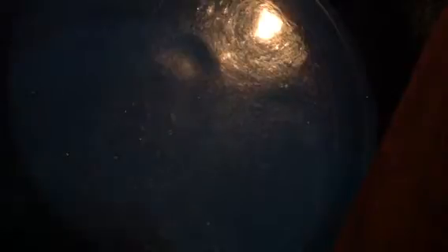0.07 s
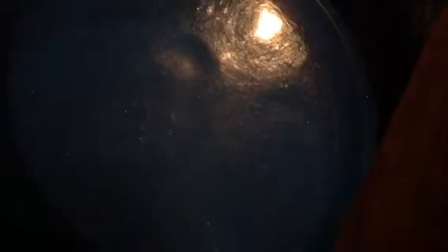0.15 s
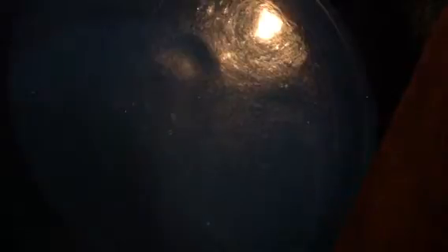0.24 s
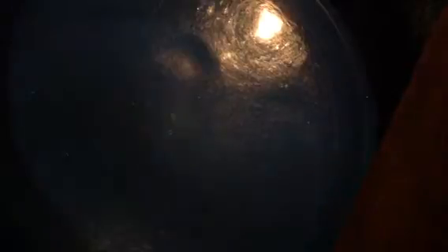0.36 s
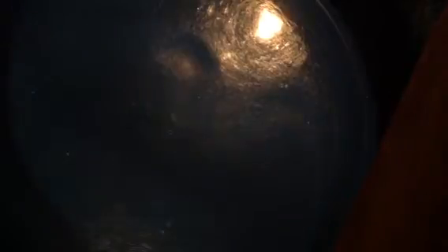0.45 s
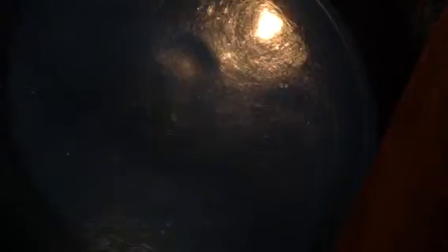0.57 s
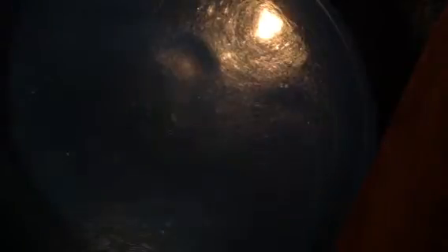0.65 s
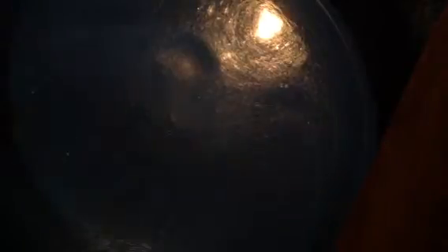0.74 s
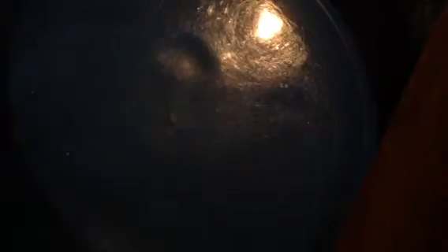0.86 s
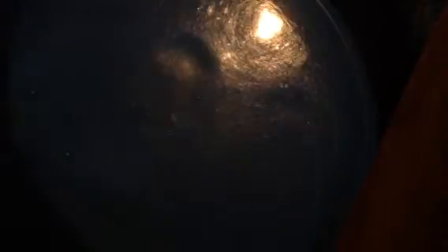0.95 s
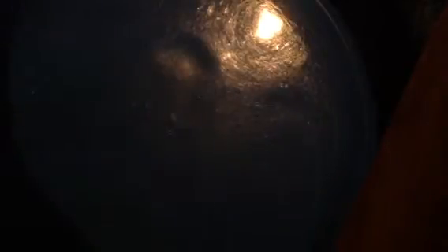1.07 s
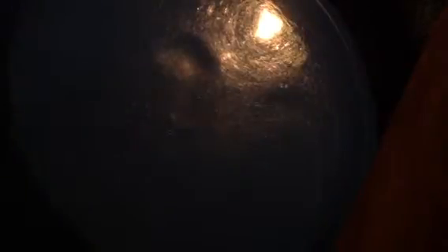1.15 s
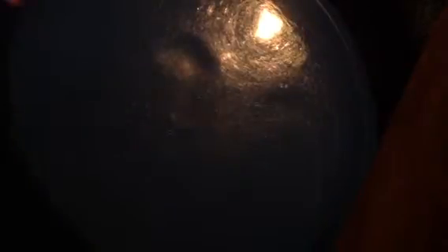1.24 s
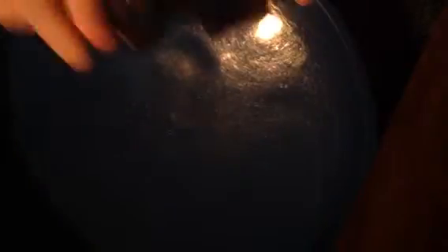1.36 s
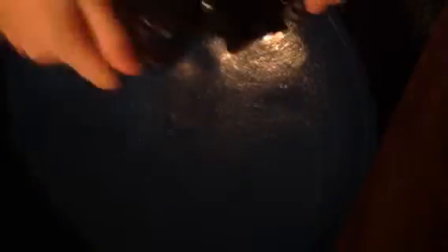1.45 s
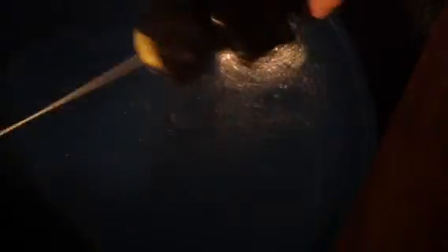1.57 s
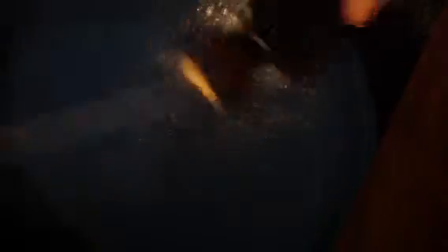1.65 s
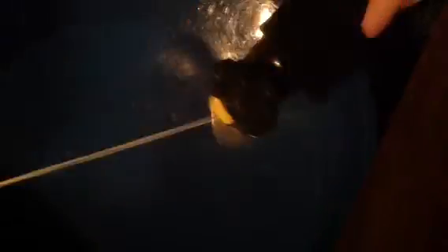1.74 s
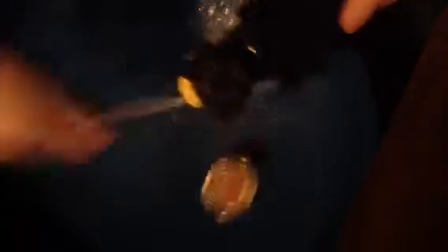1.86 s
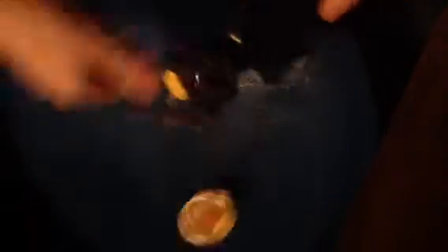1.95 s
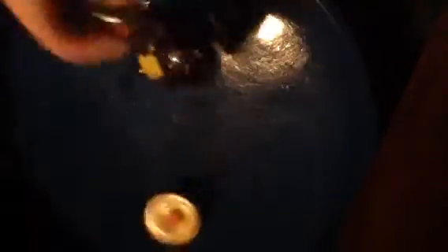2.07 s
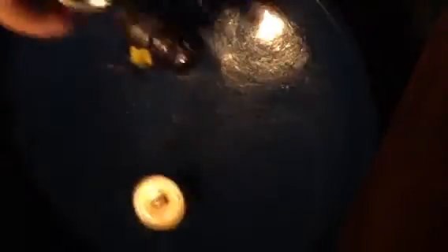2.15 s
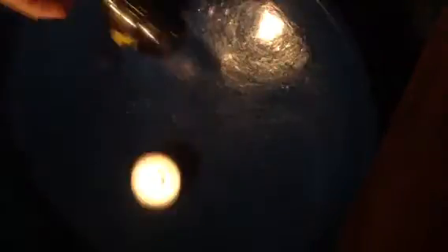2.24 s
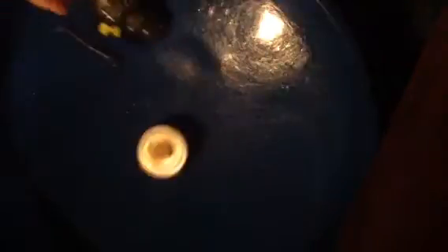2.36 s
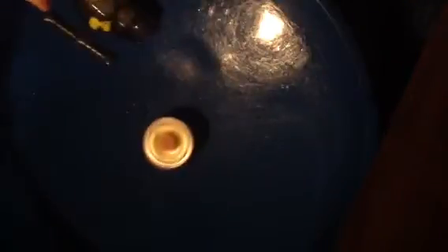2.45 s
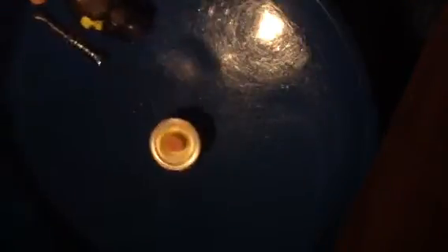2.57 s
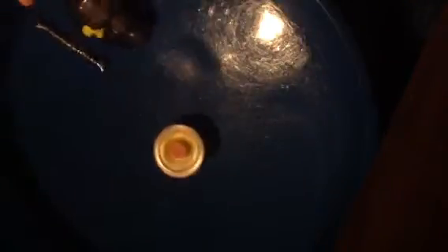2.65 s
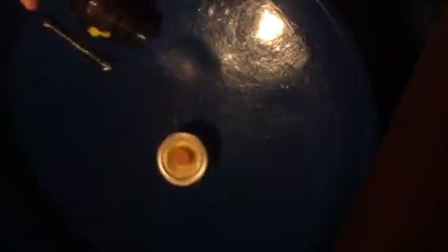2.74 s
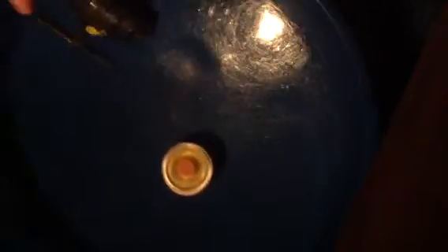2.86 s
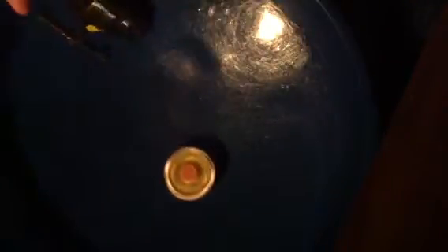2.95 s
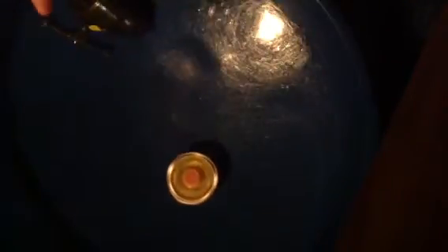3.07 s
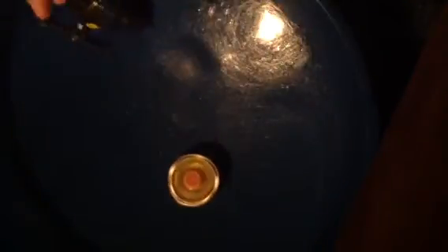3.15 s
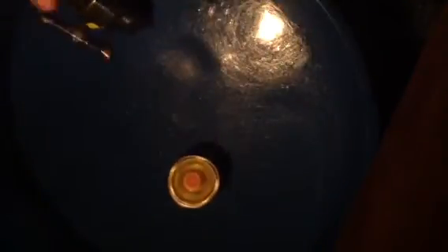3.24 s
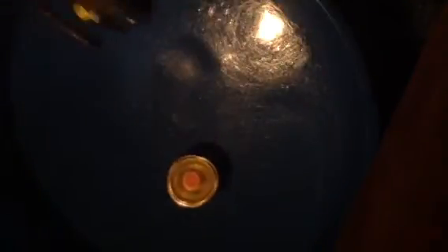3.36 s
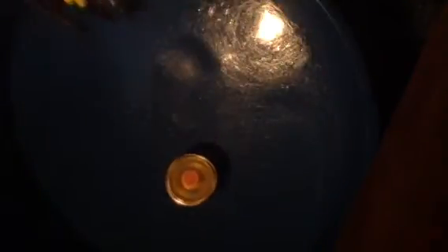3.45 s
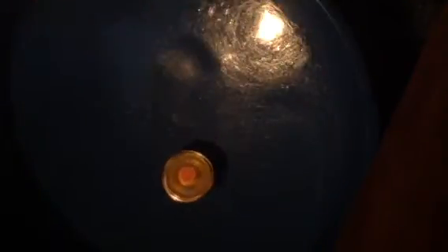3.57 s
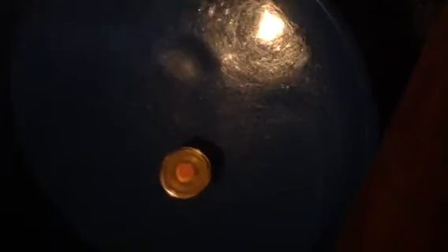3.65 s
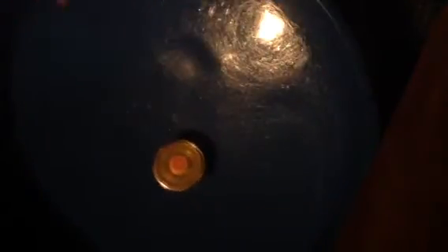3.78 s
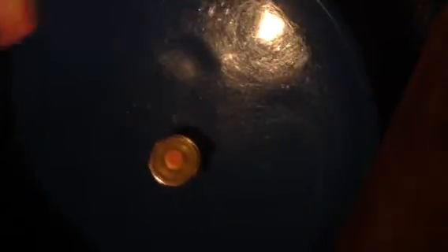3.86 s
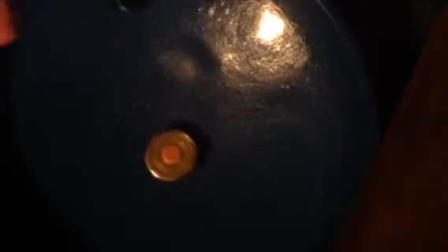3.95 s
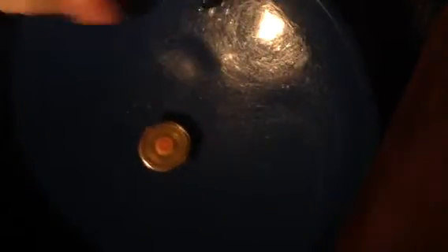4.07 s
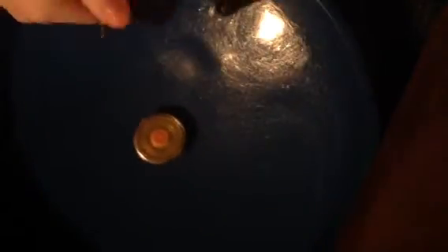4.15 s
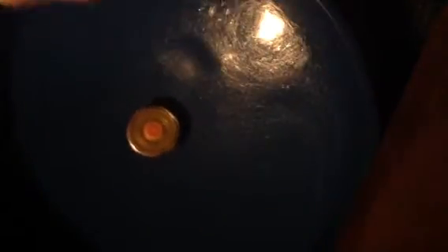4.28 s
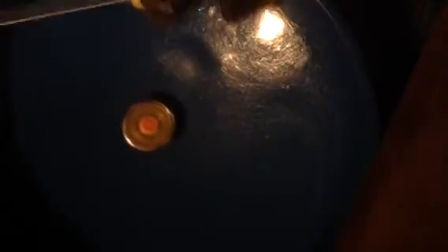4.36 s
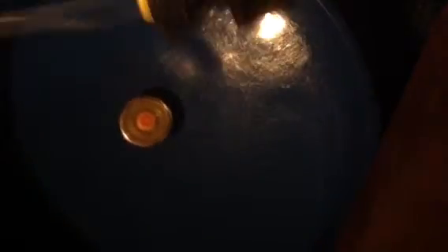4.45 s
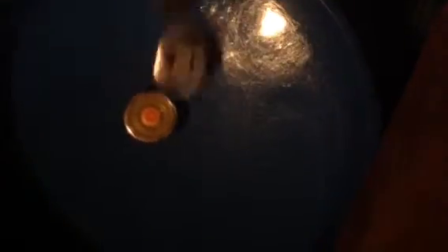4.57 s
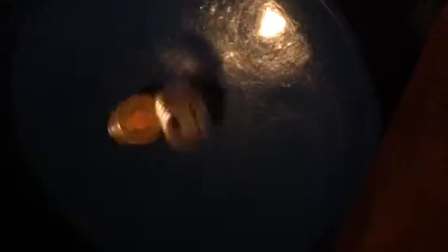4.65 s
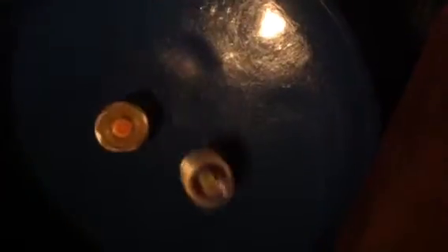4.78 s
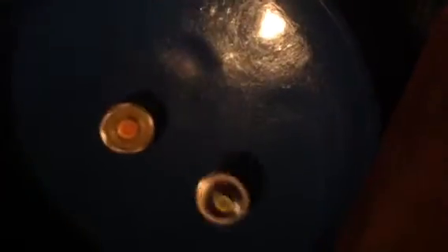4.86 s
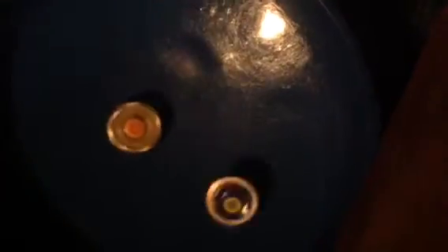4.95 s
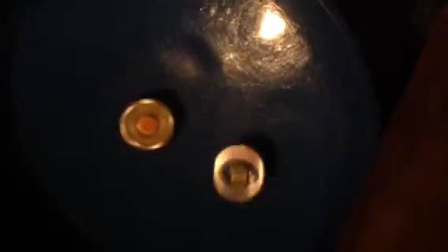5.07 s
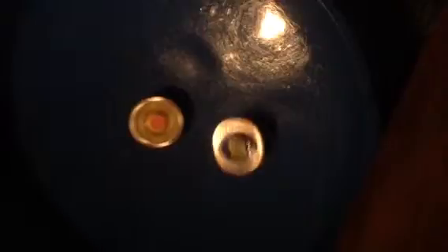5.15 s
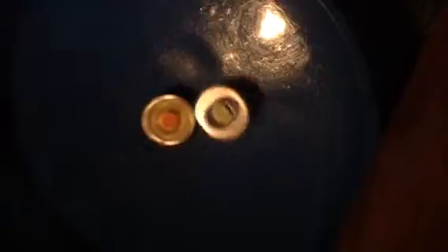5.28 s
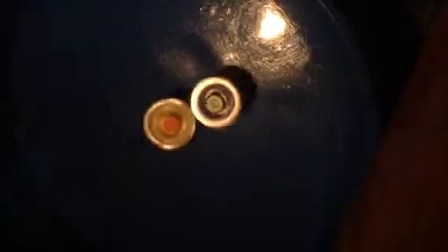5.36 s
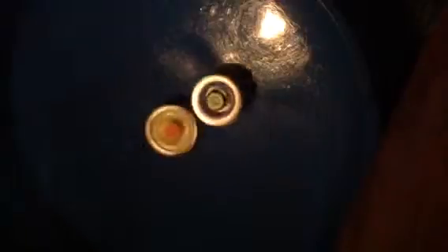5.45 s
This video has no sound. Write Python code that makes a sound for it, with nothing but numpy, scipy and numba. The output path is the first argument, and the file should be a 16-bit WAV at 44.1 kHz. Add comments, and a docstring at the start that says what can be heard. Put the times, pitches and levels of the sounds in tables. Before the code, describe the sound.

A sharp plastic click and a soft rustle of hands open the sound. From 0.5 to 0.7 seconds a toy launcher's ratchet snaps six times. At about 1.6 a ripcord gives a short gritty zip, and at 1.8 a spinning top thuds into a thin plastic bowl, bounces and grinds, then settles into a quiet low hum. Launcher parts click, chafe and chink with tiny metallic rings from 2 to 3.5 seconds. Four more ratchet snaps come around 3.6, followed by light ticks. A second, louder zip at 4.4 drops another top at 4.5 among sharp clacks. It hops with hollow knocks and brief bright scrapes, growing lighter until 5.3. The tops' metal rims clash sharply at 5.4 and again just before 5.5. Everything is close to the microphone, with a short small-room echo over faint hiss.

```python
"""Spinning tops in a plastic bowl

A small room, one microphone close to the bowl. Two toy tops are twisted into a plastic launcher,
spun up by a ripcord and dropped in, one after the other. Launcher parts click, chink and chafe, and
the cord rips through its gear. Each top thuds down and hums on its tip; the second hops and skids,
and the metal rims clash at the end. The walls answer briefly over a faint hiss."""
import sys
import numpy as np
from scipy import signal
from scipy.fft import rfft, irfft
from scipy.io import wavfile
from scipy.ndimage import uniform_filter1d
from numba import njit

SR = 44100
rng = np.random.default_rng(int(sys.argv[2]) if len(sys.argv) > 2 else 0)


def master_out(mix):
    """Clip the mix to full scale and print it as 16-bit PCM to the path in sys.argv[1]."""
    frames = np.transpose(np.atleast_2d(mix))
    ceiling = np.clip(frames, -1, 1)
    pcm = np.round(ceiling * 32767).astype(np.int16)
    wavfile.write(sys.argv[1], SR, pcm)


N = 243115
LEAD = 4096  # samples of run-up before 0 s
M = N + LEAD
T = (np.arange(M) - LEAD) / SR

# modes of the thin plastic bowl: f/Hz, level/dB, t60/s
BOWL_MODES = [(180, -2, 0.038), (241.3, 0, 0.044), (300, -2.5, 0.054), (361, 1, 0.035), (437, -3, 0.034),
              (534, -0.5, 0.031), (657, -1.5, 0.056), (814, -3, 0.049), (1036, -28.5, 0.31),
              (1420, 5, 0.03), (1700, 8, 0.06)]
# bright resonances of hard parts in contact: f/Hz, width/Hz, level/dB
TREBLE_PEAKS = [(6540, 1200, -13.5), (8940, 4760, 13), (14000, 6040, 12)]


def spin(turns_per_s=53.2, slowing_per_s2=.91, steady_share=.22, settle_s=.77):
    """An off-centre tip presses the bowl once a turn; grinding noise takes over after each landing."""
    # tip on the bowl: t/s, level/dB, ring under the tip f/Hz
    path = [(1.78, -52, 308), (2.2, -39, 300), (2.3, -49.5, 330), (2.6, -57, 347), (2.85, -54, 340),
            (2.93, -56, 408), (3.15, -65, 398), (3.3, -63.5, 310), (3.6, -61, 516), (3.95, -62, 300),
            (4.25, -54, 312), (4.45, -54, 300), (4.55, -36.5, 300), (4.9, -45, 385), (5.1, -43.5, 660),
            (5.3, -43.5, 446), (5.51, -44, 300)]
    # the tops land: t/s
    landings = [1.78, 4.6]
    turns = np.cumsum(turns_per_s - slowing_per_s2 * T) / SR
    taps = unit(np.diff(np.floor(turns), prepend=0))
    unsettled = sum((T > at) * np.exp(-((T - at) / settle_s) ** 2) for at in landings)
    noise_share = np.clip(steady_share + (1 - steady_share) * unsettled, 0, 1)
    grinding = rng.standard_normal(M) * undb(2.5 * walk(27))
    drive = np.sqrt(1 - noise_share) * taps + np.sqrt(noise_share) * grinding
    drive = signal.sosfilt(signal.butter(3, 750, fs=SR, output="sos"), drive)
    bowl = sum((-1) ** k * undb(db) * band(drive, f, 5.3 / t60)
               for k, (f, db, t60) in enumerate(BOWL_MODES))
    s, _, hz = np.transpose(path)
    hz = np.interp(T, s, hz)
    under_tip = glide(glide(drive, hz, .14), hz, .38)
    return curve(path) * unit(unit(bowl) + 1.35 * unit(under_tip))


def thuds(push_s=.0013):
    """A landing tip gives the bowl floor a short push; the open bowl radiates little deep bass."""
    # tip strikes: t/s, peak level/dB, most driven f/Hz
    strikes = [(1.778, 0, 294), (1.808, -14.5, 262), (1.907, -6, 350), (1.987, -23.5, 250),
               (2.047, -20, 250), (2.105, -23, 253), (2.131, -23, 248), (2.175, -31, 336),
               (2.209, -34, 294), (2.237, -34.5, 294), (2.358, -34, 373), (4.521, -8, 244),
               (4.536, -17, 270), (4.551, -18, 330), (4.607, -19, 360), (4.691, -11, 206),
               (4.765, -15.5, 237), (4.822, -21.5, 355), (4.873, -25, 361), (4.923, -22.5, 362),
               (4.981, -27, 353), (5.023, -28.5, 614), (5.066, -31, 560), (5.103, -24.5, 614),
               (5.135, -27.5, 615), (5.174, -24.5, 221), (5.238, -32, 645), (5.276, -28, 219),
               (5.407, -19, 255)]
    out, t = np.zeros(M), np.arange(SR // 3) / SR
    low_cut = signal.butter(2, 190, "high", fs=SR, output="sos")
    push = np.hanning(int(push_s * SR))
    for s, db, hz in strikes:
        modes = ring(t, BOWL_MODES, hz, 7.2) * np.minimum(t / .0023, 1)
        thud = signal.sosfilt(low_cut, np.convolve(modes, push))
        add(out, s, undb(db) * thud / np.abs(thud).max())
    return out


def skids():
    """The tip of the hopping top scrapes the bowl in short, bright bursts of noise."""
    # scrapes on the bowl: t/s, relative level/dB, length/s
    scrapes = [(4.82, -13, 0.0096), (4.868, -16, .014), (4.919, -19, 0.01), (4.978, -19.5, 0.017),
               (5.021, -19.5, 0.0099), (5.058, -20.5, 0.024), (5.093, -23, 0.021), (5.136, -19.5, 0.0096),
               (5.176, -19.5, 0.0077), (5.193, -24, 0.021), (5.239, -20.5, 0.004), (5.278, -17.5, .002),
               (5.31, -27.5, .0036), (5.328, -27, 0.0017), (5.363, -29.5, .002)]
    out, t = np.zeros(M), np.arange(SR // 10) / SR
    for s, db, length in scrapes:
        envelope = .5 / (1 + (t / max(length, .002)) ** 8) + .5 * fade(t, .0067)
        noise = rng.standard_normal(len(t))
        scrape = unit(colour(noise, TREBLE_PEAKS)) + undb(5) * unit(shell(noise))
        add(out, s, undb(db - 18.5) * np.minimum(t / .0015, 1) * envelope * scrape)
    return out


def clashes():
    """The metal rims of the two tops strike each other and ring."""
    # rim hits: t/s, crack level/dB, body/dB re crack, body f/Hz, rim/dB re crack
    hits = [(5.3965, 0, -17, 3450, -32), (5.4022, 2, -12, 4550, -28), (5.4115, -9, 3, 4600, -10),
            (5.469, -1, -17, 3680, -32)]
    return knocks(hits, rise_s=.0004, t60=.009, width=.2, wall_db=-17)


def ripcord(attack_s=.082, release_s=.011, rest_hz=1060, fast_hz=1500, sag=.19):
    """Teeth hammer the gear too fast to count: lumpy grit through a shell whose ring rises with speed."""
    # pulls: start t/s, end t/s, body level on reaching full speed/dB, swell from there/dB
    pulls = [(1.553, 1.714, -23, -4), (4.339, 4.487, -20, 1.5)]
    teeth = grit(2300, .46) * undb(.58 * walk(130))
    treble, out = unit(colour(teeth, TREBLE_PEAKS)), 0
    for start, end, db, swell_db in pulls:
        speed = np.sin(np.pi / 2 * np.clip((T - start) / attack_s, 0, 1))
        run = np.clip((T - start - attack_s) / (end - start - attack_s), 0, 1)
        hz = (rest_hz + (fast_hz - rest_hz) * speed ** 3) * (1 - sag * run)
        gain = (T > start) * undb(db - 34.5 * (1 - speed) + swell_db * run ** 2.7)
        gain *= fade(np.maximum(T - end, 0), release_s)
        low_ring = unit(glide(glide(teeth, hz, .3), hz, .19))
        high_ring = unit(glide(teeth, (1.76 + 1.03 * run) * hz, .44))  # goes on rising
        body = unit(unit(shell(teeth)) + .89 * low_ring)
        body = unit(body + .45 * high_ring)
        out += gain * (body + undb(-4) * treble)
    return out


def ratchets():
    """The launcher's ratchet snaps as a top is twisted in."""
    # snaps: t/s, crack level/dB, body/dB re crack, body f/Hz
    snaps = [(0.497, -4, -6.5, 3700), (0.5368, -1.5, -7, 3620), (0.589, -3.5, -6, 3800),
             (0.6167, -2.5, -11.5, 3550), (0.6443, -1.5, -10.5, 3920), (0.6749, -6, -4, 3640),
             (3.5739, -2.5, -14.5, 2980), (3.5998, -4.5, -8, 4640), (3.6255, -4, -7.5, 3340),
             (3.671, -1.5, -9.5, 3180)]
    return knocks(snaps, rise_s=.0004, t60=.013, width=.09, wall_db=-7)


def clicks():
    """Parts of the launcher and the tops knock together."""
    # knocks, the first just before 0 s: t/s, crack level/dB, body/dB re crack, body f/Hz
    hits = [(-0.048, 0, -4, 2580), (0.168, -48, 6, 1100), (0.2216, -45, 10, 1690), (0.2359, -28.5, 5, 3770),
            (0.3456, -47.5, 6, 1800), (0.845, -39, 4.5, 2730), (1.0154, -45.5, 3, 2630),
            (1.3, -50, 6.5, 1100), (1.3244, -48.5, 6, 1046), (1.368, -43.5, 1.5, 1095),
            (1.4472, -45, 2, 1110), (1.6636, -10, -0.5, 3170), (1.708, -4, -6, 3530),
            (1.7165, -17, -3, 3470), (1.7658, -22, -24, 3780), (1.7782, -11.5, 5.5, 1500),
            (1.8604, -25, -3, 1110), (1.8742, -23.5, 0, 1670), (1.9048, -15, -2, 1140),
            (1.934, -21, -2, 1590), (1.9714, -21, -6.5, 3220), (1.9855, -4.5, -8.5, 1367),
            (2.008, -19, 4.5, 1200), (2.0496, -29, -10, 1460), (2.0708, -19, -6, 1400),
            (2.0856, -15, 1.5, 3430), (2.1132, -18, -7, 1280), (2.129, -5.5, -7, 4300),
            (2.1783, -42.5, 13.5, 1050), (2.2686, -32, 2.5, 2480), (2.315, -33, -5.5, 1070),
            (2.3526, -25.5, -2, 4000), (2.359, -9.5, -2.5, 1420), (2.3969, -19, -1, 1370),
            (2.562, -31, 0, 1430), (2.578, -35.5, 3.5, 3700), (2.6267, -46.5, 11, 1470),
            (2.7199, -28.5, -5.5, 1350), (2.7514, -49, 6, 1260), (2.8444, -40, -3.5, 1260),
            (2.8912, -34.5, 1.5, 1500), (2.9045, -31.5, 2.5, 1470), (2.9357, -37, -2.5, 1400),
            (3.0173, -27, -5.5, 1420), (3.0849, -15.5, -5.5, 3700), (3.1044, -8.5, -4.5, 1455),
            (3.3328, -45, 6, 1460), (3.3656, -33, 4, 1210), (3.3808, -41.5, 15, 1480),
            (3.4552, -21.5, 3, 3390), (3.6553, -31.5, -6, 3550), (3.8207, -34.5, 4, 1030),
            (3.829, -30, 2, 1680), (3.849, -28.5, -4, 1260), (3.8651, -20, -3.5, 1060),
            (3.919, -37, 4, 1090), (4.13, -48.5, 4, 1156), (4.1742, -45, 7, 1060), (4.2118, -42, -14, 1060),
            (4.237, -37, 5, 2590), (4.2549, -35.5, 10, 2730), (4.3182, -27.5, -3, 1330),
            (4.3759, -16, -3.5, 1400), (4.472, -2, -13, 3430), (4.486, -3, -5.5, 3000),
            (4.4977, -9.5, -8, 1310), (4.5805, -12.5, -4.5, 1320), (4.6104, -15, 0.5, 1490),
            (4.669, -0.5, -2, 3550), (4.6734, -6.5, 3, 4000), (4.6915, 1, -12.5, 1110),
            (4.718, -9.5, -16, 3320), (4.7694, -12.5, 2, 4060)]
    return knocks(hits, rise_s=.0012, t60=.018, width=.17, wall_db=-11)


def knocks(hits, rise_s, t60, width, wall_db):
    """Contact noise cracks and rings the plastic body; rows: sound close by, sound sent to the walls."""
    # modes of a top's metal rim: f/Hz, level/dB, t60/s
    rim_modes = [(3640, 0, .22), (3760, 0, .2), (4250, -3, .1), (7830, -4, .08), (9720, 6, .03),
                 (10750, 5, .03), (15020, 3, .03)]
    out, t = np.zeros((2, M)), np.arange(SR // 6) / SR
    impulse = 1. * (t == 0)
    even_crack = unit(colour(impulse, TREBLE_PEAKS))
    for s, db, body_db, hz, *rim_db in hits:
        contact = rng.standard_normal(len(t)) * fade(t, t60) * np.minimum(t / rise_s, 1)
        crack = colour(contact, TREBLE_PEAKS) + undb(-1.5) * contact
        crack /= np.abs(crack).max()
        main_ring = band(band(contact, hz, width * hz), hz, .5 * hz)
        body = shell(contact, hz, 2.64) + 2.6 * main_ring
        body *= undb(body_db) / np.abs(body).max()
        rim = undb(rim_db) * ring(t, rim_modes, 3900, 4.2) if rim_db else 0
        add(out[0], s, undb(db) * (crack + body + rim))
        # the walls hear the knock from all sides at once, so its colour is even there
        even_body = unit(shell(impulse, hz, 5) + .58 * band(impulse, hz, width * hz))
        add(out[1], s, undb(db + wall_db) * (crack.std() * even_crack + body.std() * even_body))
    return out


def shell(x, loud_hz=2000., db_per_octave=0.):
    """The plastic shell rings, driven hardest near loud_hz; it is too small to radiate bass."""
    # shell resonances: f/Hz, width/Hz, level/dB
    resonances = [(1320, 500, 6.5), (2092, 1270, 1.5), (3060, 1500, -5.5), (4600, 2950, -4.5)]
    peaks = [(hz, width, db - db_per_octave * abs(np.log2(hz / loud_hz)))
             for hz, width, db in resonances]
    return signal.sosfilt(signal.butter(4, 1000, "high", fs=SR, output="sos"), colour(x, peaks))


def chinks():
    """Loose metal parts in the launcher tick, then ring."""
    # contacts: t/s, relative level/dB, most driven f/Hz
    contacts = [(2.3236, -37, 9550), (2.362, -10.5, 9200), (2.3984, -21.5, 10200), (2.4307, -20.5, 10100),
                (2.7185, -32.5, 9600), (2.793, -32, 14000), (2.81, -31.5, 10000), (2.8395, -35.5, 10000),
                (2.9032, -32, 11200), (2.922, -28, 10300), (2.9695, -37.5, 9390), (3.0165, -42, 11000),
                (3.0235, -35, 10900), (3.0594, -24.5, 10400), (3.0747, -21, 13500), (3.0838, -23, 8140),
                (3.103, -10.5, 14000), (3.8386, -28, 10400), (3.8683, -16.5, 10400), (4.3258, -13, 13100),
                (4.692, -13, 9300), (4.718, -15, 9800)]
    # modes of the small parts: f/Hz, level/dB, t60 before extra damping/s
    metal_modes = [(7850, -3, .03), (9400, 0, .03), (10100, 0, .04), (11050, -3, .065), (13850, -2, .03),
                   (15000, -8, .025)]
    out, t = np.zeros(M), np.arange(SR // 6) / SR
    for s, db, hz in contacts:
        tick = colour(rng.standard_normal(len(t)) * fade(t, .016), TREBLE_PEAKS)
        rise = np.minimum(t / .00058, 1)
        modes = ring(t, metal_modes, hz, 45) * fade(t, .065)
        add(out, s, undb(db + 4) * (.37 * tick / np.abs(tick).max() + rise * modes))
    return out


def chafe():
    """Loose parts rub between the knocks: fine grit that flickers."""
    # rubbing through the shell: t/s, level/dB
    levels = [(1.72, -67), (1.8, -38.5), (1.88, -40), (2.0, -37.5), (2.25, -55.5), (2.45, -54), (2.6, -65),
              (3.3, -60.5), (3.55, -52.5), (3.85, -53), (3.96, -84), (4.25, -52.5), (4.32, -55),
              (4.5, -29.5), (4.62, -30.5), (4.8, -48), (5.0, -78), (5.38, -54), (5.51, -64)]
    rub = grit(4000, 1.5) * undb(1.1 * walk(60))
    return curve(levels) * (unit(shell(rub)) + undb(-3.5) * unit(colour(rub, TREBLE_PEAKS)))


def rustle():
    """Hands rustle softly at the start: dull, flickering noise."""
    # hand movement: t/s, level/dB
    levels = [(-.1, -61), (.15, -59), (.4, -72)]
    flicker = undb(1.5 * walk(30))
    return curve(levels) * flicker * unit(colour(rng.standard_normal(M), [(330, 350, 0)]))


def room(x):
    """The small room's diffuse echo builds up in 2 ms and dies within about a third of a second."""
    # decay by band: f/Hz, t60/s
    decays = [(400, 0.31), (1500, 0.12), (4000, 0.31), (10000, 0.15)]
    t = np.arange(SR // 2) / SR
    echo = sum(band(rng.standard_normal(len(t)), hz, 1.15 * hz) * fade(t, t60) for hz, t60 in decays)
    echo *= np.minimum(t / .002, 1) ** 2
    return signal.fftconvolve(x, echo / np.sqrt(np.sum(echo ** 2)))[:M]


def hiss(level_db=-62):
    """Room tone: still air and the microphone's own noise."""
    # noise spectrum: f/Hz, relative level/dB
    spectrum = [(24, -71), (40, -53.5), (103, -9.5), (218, -11), (280, -5), (317, -6), (496, -9),
                (606, -10.5), (973, -17.5), (7710, -25), (14400, -26), (15500, -31.5)]
    hz, db = np.transpose(spectrum)
    f = np.maximum(np.arange(M // 2 + 1) * SR / M, 1)
    gain = undb(np.interp(np.log(f), np.log(hz), db))
    return undb(level_db) * unit(irfft(rfft(rng.standard_normal(M)) * gain, M))


def ring(t, modes, loud_hz, db_per_octave):
    """Struck modes, driven hardest near loud_hz, each blow a little differently; peak 1."""
    hz, db, t60 = np.transpose(modes)[:, :, None]
    chance = rng.standard_normal((24, 1))
    gain = undb(db + 2.2 * chance[:len(hz)] - db_per_octave * np.abs(np.log2(hz / loud_hz)))
    hz = hz * (1 + .005 * chance[-len(hz):])
    y = np.sum(gain * fade(t, t60) * np.sin(2 * np.pi * hz * t), axis=0)
    return y / np.abs(y).max()


def band(x, hz, width_hz):
    """Two-pole resonance, gain 1 at the centre."""
    return signal.lfilter(*signal.iirpeak(hz, hz / width_hz, fs=SR), x)


def colour(x, peaks):
    """Sum of broad resonances with steep skirts."""
    return sum(undb(db) * band(band(x, hz, 1.93 * w), hz, 1.93 * w) for hz, w, db in peaks)


@njit
def glide(x, hz, damp):
    """State-variable band-pass whose centre moves."""
    y, band_state, low_state = np.empty(len(x)), 0., 0.
    for i in range(len(x)):
        g = np.tan(np.pi * hz[i] / SR)
        passed = (band_state + g * (x[i] - low_state)) / (1 + g * (g + damp))
        band_state = 2 * passed - band_state
        low_state += 2 * g * passed
        y[i] = damp * passed
    return y


def grit(rate, scatter_db):
    """Dense random ticks of scattered size."""
    tick = rng.random(M) < rate / SR
    return unit(tick * rng.standard_normal(M) * undb(scatter_db * rng.exponential(size=M)))


def walk(rate):
    """Random levels held 1 / rate s and slewed; spread near 1."""
    hold = int(SR / rate)
    return 1.4 * uniform_filter1d(np.repeat(rng.standard_normal(M // hold + 1), hold), hold)[:M]


def curve(table):
    """Gain from rows of t/s, level/dB; silent outside them."""
    s, db = np.transpose(table)[:2]
    return undb(np.interp(T, s, db, left=-120, right=-120))


def fade(t, t60):
    """Exponential decay."""
    return np.exp(-np.log(1000) * t / np.maximum(t60, .002))


def add(out, s, x):
    """Mix x into out from time s."""
    i = LEAD + int(s * SR)
    out[i:i + len(x)] += x[:M - i]


def undb(db):
    return 10 ** (np.asarray(db) / 20)


def unit(x):
    """Scale to rms 1."""
    return x / np.sqrt(np.mean(x ** 2))


@njit
def limit(x, top, slope, attack_s, release_s):
    """Gain control: follows the peaks and turns down what passes the top."""
    y, envelope = np.empty(len(x)), 0.
    for i in range(len(x)):
        size = abs(x[i])
        envelope += (size - envelope) / (SR * (attack_s if size > envelope else release_s))
        y[i] = x[i] * (top / max(envelope, top)) ** slope
    return y


def scene():
    """Launcher and bowl close to the microphone, the room behind them."""
    knocking, to_walls = clicks() + ratchets() + clashes()
    action = chinks() + skids() + thuds() + ripcord()
    echo = room(to_walls + undb(-13) * action)
    return (knocking + action + echo + chafe() + spin() + hiss() + rustle())[None, LEAD:]


def record(dry):
    """The mono recorder drops the deep bass, holds the loudest peaks down and cuts the highest treble."""
    x = signal.sosfilt(signal.butter(4, 140, "high", fs=SR, output="sos"), dry[0])
    x = limit(x, top=undb(-5), slope=.33, attack_s=.00057, release_s=.028)
    x = .7 * np.tanh(x / .7)
    x = signal.sosfilt(signal.cheby2(8, 22, 15600, fs=SR, output="sos"), x)
    return signal.sosfilt(signal.ellip(8, .2, 70, 16400, fs=SR, output="sos"), x)[None]


dry = scene()
out = record(dry)
master_out(out)
```